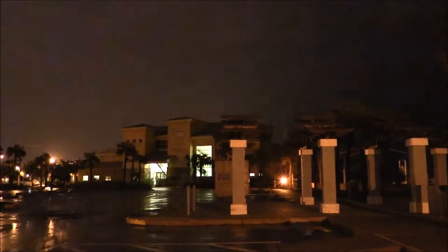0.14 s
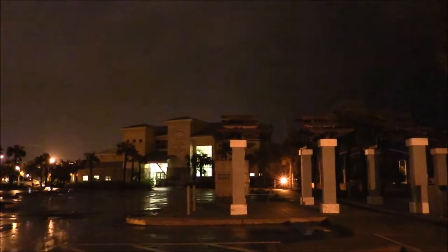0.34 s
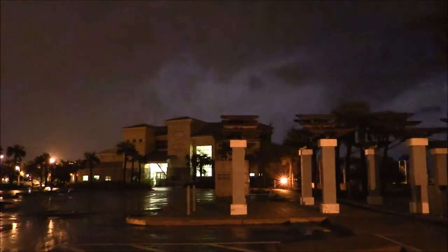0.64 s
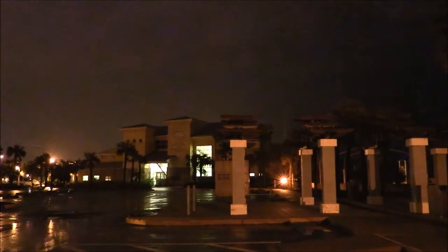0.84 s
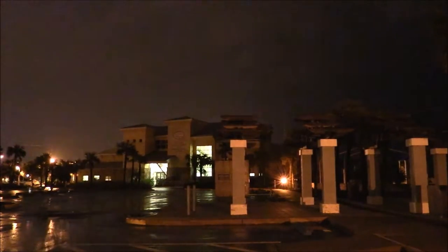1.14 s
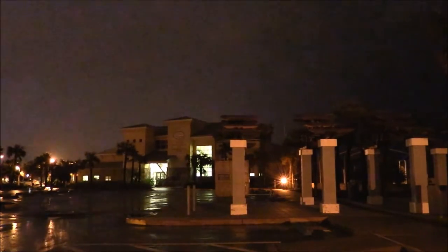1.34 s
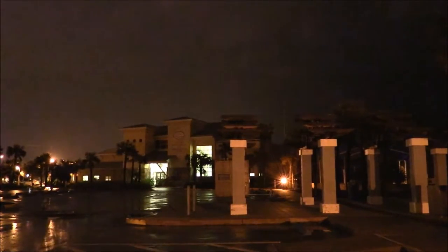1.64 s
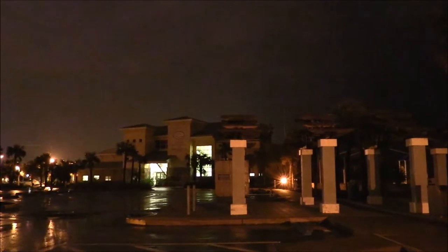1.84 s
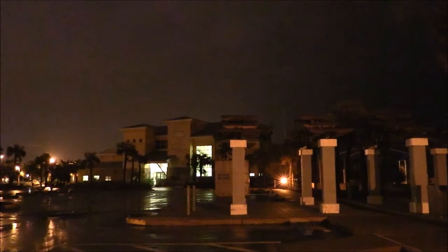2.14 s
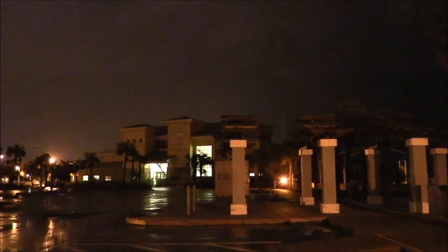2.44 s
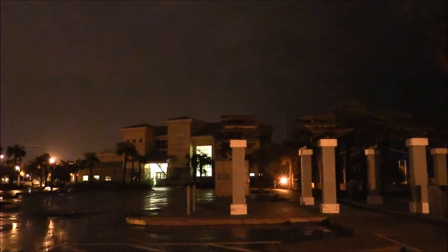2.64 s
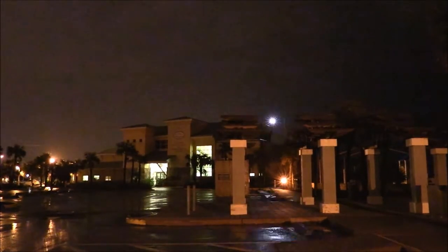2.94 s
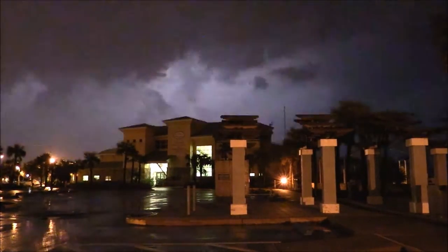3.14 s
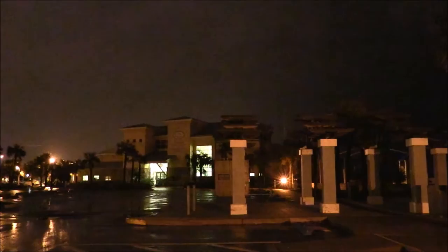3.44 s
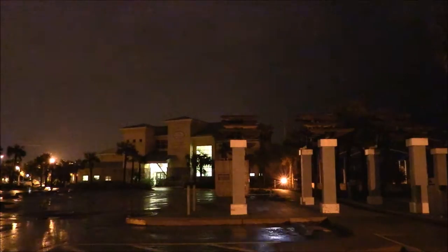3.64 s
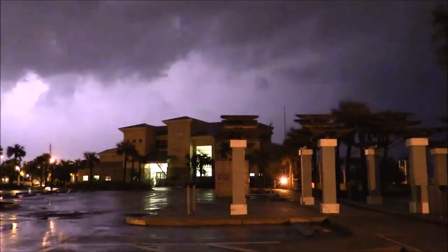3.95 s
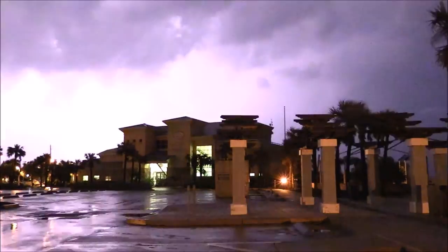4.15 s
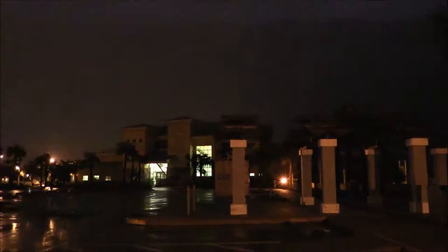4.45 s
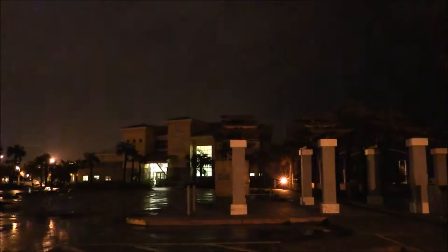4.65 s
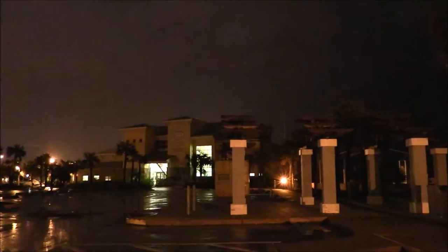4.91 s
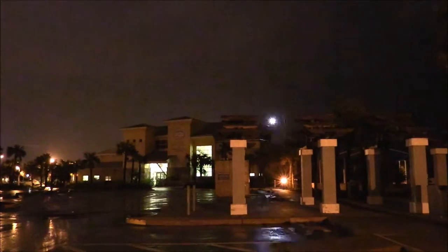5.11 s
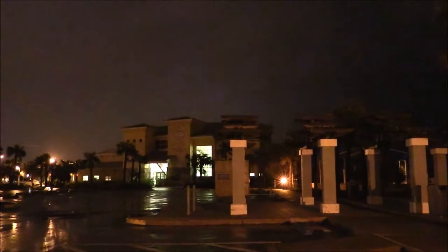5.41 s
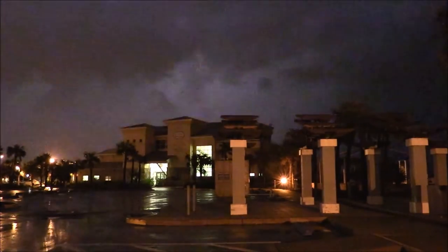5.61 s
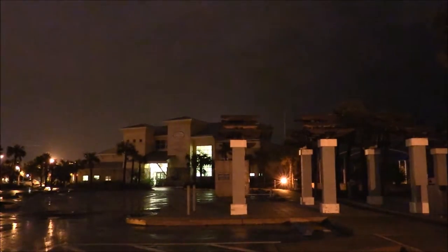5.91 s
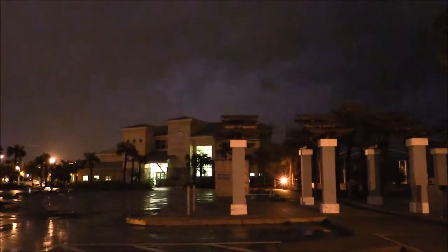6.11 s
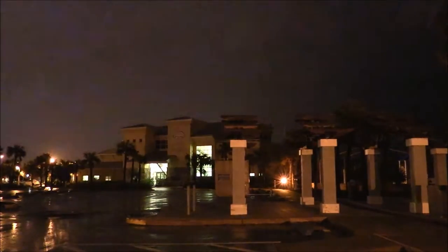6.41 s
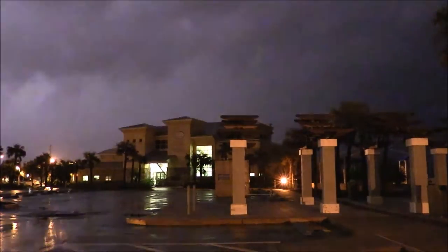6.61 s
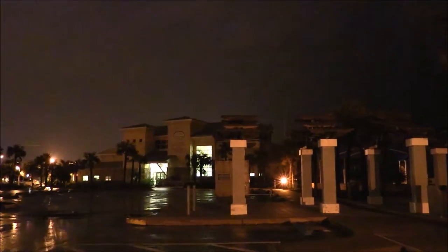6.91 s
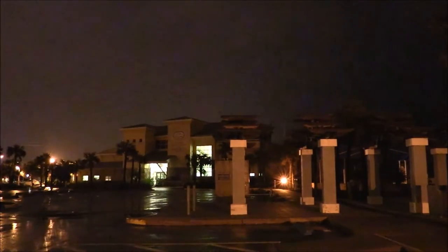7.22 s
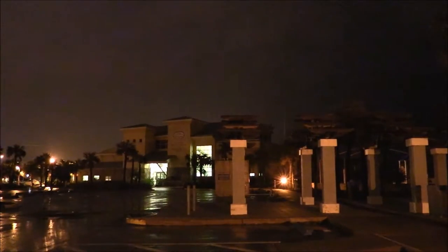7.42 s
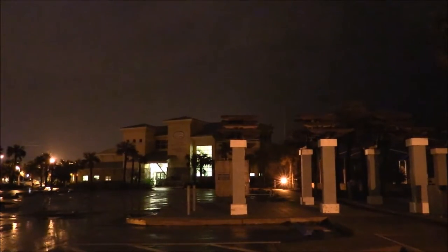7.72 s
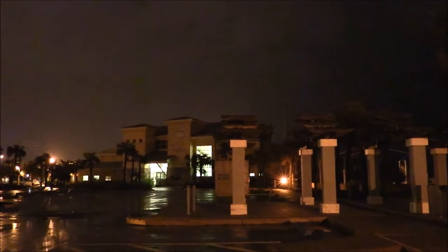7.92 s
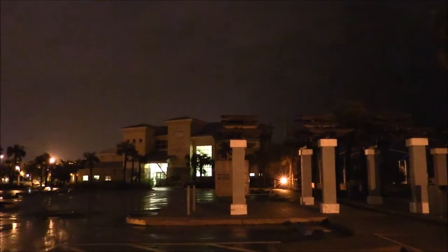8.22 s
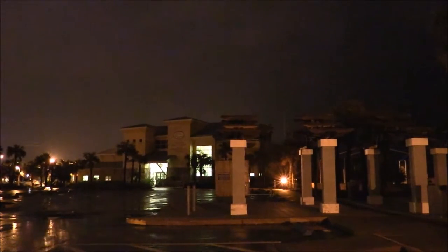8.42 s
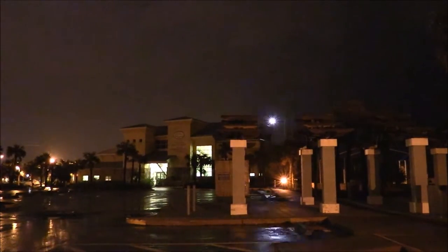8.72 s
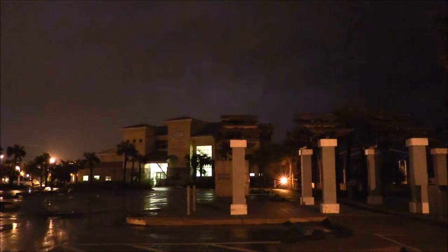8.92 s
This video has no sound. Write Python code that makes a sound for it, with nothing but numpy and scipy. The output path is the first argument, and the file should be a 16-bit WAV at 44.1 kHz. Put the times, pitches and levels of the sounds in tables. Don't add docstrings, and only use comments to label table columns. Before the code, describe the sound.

Deep thunder cracks and rolls over dull rain while an idling engine clatters close by and gusts of wind buffet the microphone.

```python
import sys
import numpy as np
from scipy import signal
from scipy.fft import rfft, irfft, next_fast_len
from scipy.io import wavfile
from scipy.ndimage import uniform_filter1d

SR = 44100
rng = np.random.default_rng(int(sys.argv[2]) if len(sys.argv) > 2 else 0)


def boost_factor(decibels):
    exponent = np.asarray(decibels, float) / 20
    return 10 ** exponent


def bounce(signal):
    frames = np.transpose(np.atleast_2d(signal))
    limited = np.clip(frames, -1, 1)
    pcm = np.round(limited * 32767).astype(np.int16)
    wavfile.write(sys.argv[1], SR, pcm)


N = 399546


def evened(x):
    return x / np.sqrt(np.mean(x ** 2) + 1e-20)


def curve(rows, column):
    rows = np.asarray(rows)
    return np.interp(np.arange(N) / SR, rows[:, 0], rows[:, column])


def swells(times, rise_db, seconds):
    t = np.arange(0, N + 64, 64) / SR
    distance = (t[:, None] - np.asarray(times)) / np.asarray(seconds)
    bells = np.asarray(rise_db) * np.exp(-distance ** 2)
    return np.interp(np.arange(N) / SR, t, bells.sum(axis=1))


def coloured(x, points):
    size = next_fast_len(len(x))
    f, db = np.transpose(points)
    octave = np.log2(np.fft.rfftfreq(size, 1 / SR) + 1)
    below = np.maximum(np.log2(f[0]) - octave, 0) * 20.0
    above = np.maximum(octave - np.log2(f[-1]), 0) * 79.0
    shape_db = np.interp(octave, np.log2(f), db) - (below + above)
    return evened(irfft(rfft(x, size) * boost_factor(shape_db), size)[:len(x)])


def grains(per_s, spread_db):
    chance, size = rng.random(N), rng.exponential(1, N)
    sign = rng.choice([-1., 1.], N)
    return (chance < per_s / SR) * sign * boost_factor(spread_db * np.minimum(size, 4))


def resonate(x, hz, width):
    turn = np.exp(2j * np.pi * np.cumsum(hz * np.ones(len(x))) / SR)
    r = np.exp(-np.pi * width / SR)
    return 2 * (turn * signal.lfilter([1 - r], [1, -r], x / turn)).real


def wander(seconds):
    size = int(seconds * SR)
    once = uniform_filter1d(rng.standard_normal(N), size)
    return evened(uniform_filter1d(once, size))


# (f/Hz, level/dB per Hz)
RAIN_TONE = [(250, -73), (400, -72.5), (650, -79), (1100, -80.5), (1600, -81.5), (1900, -88.5),
             (2700, -88.5), (3000, -91.5), (3800, -89), (5500, -99.0), (7000, -102.3), (10000, -110.7),
             (12000, -111.8), (15600, -118.2)]


def rain(gain_db):
    drops = rng.standard_normal(N) + 0.3 * evened(grains(per_s=2500, spread_db=5.0))
    level_db = -48.5 + gain_db + .6 * wander(0.038)
    return boost_factor(level_db) * coloured(drops, RAIN_TONE)


# (t/s, level/dB, f/Hz, width/Hz, length/ms)
SPLASHES = [
    (3.236, -56, 9000, 5950, 25),
    (3.69, -54, 6500, 3000, 10),
    (3.964, -45, 10000, 2400, 14),
    (3.964, -51, 5600, 800, 13),
    (3.999, -56, 8000, 5000, 120),
    (5.72, -56, 9500, 6000, 20),
]


def splashes():
    t, out = np.arange(-4096, 4096) / SR, np.zeros(N)
    for s, db, hz, width, ms in SPLASHES:
        tone = [(hz - width / 2, -3), (hz, 0), (hz + width / 2, -3)]
        hiss = coloured(rng.standard_normal(len(t)), tone)
        at = round(s * SR) - 4096
        out[at:at + len(t)] += boost_factor(db) * hiss * np.exp(-(2 * t / (ms / 1000)) ** 4)
    return out


# (t/s, level/dB)
WIND = [(0, -66), (.3, -61), (.38, -52), (.5, -63), (1.26, -64), (1.9, -55), (2.39, -52), (2.6, -48.5),
        (3.5, -45), (4.3, -49.5), (5.03, -47), (5.7, -46.5), (6.1, -44.5), (6.8, -44.5), (7.1, -49),
        (7.45, -47), (8.68, -41.5), (9.06, -49)]
# (t/s, rise/dB, length/s)
GUSTS = [(.39, 9.5, 0.098), (1.05, 6, .08), (1.73, 8, .06), (2.55, 8, .1), (2.783, 10, 0.18),
         (3.33, 12.5, .09), (3.76, 9, 0.086), (4.298, 6, 0.2), (6.1, 3, .12), (6.53, 11, 0.12),
         (6.8, 5, 0.091), (7.6, 4, 0.19), (8.556, 9, .12)]
# (f/Hz, level/dB per Hz)
BUFFET_TONE = [(20, -22), (50, -14), (80, -4), (120, 0), (170, -1), (250, -5), (400, -14), (700, -30)]
# (f/Hz, level/dB per Hz)
ROAR_TONE = [(150, -19), (280, 2.5), (400, -3.5), (550, -4), (800, -8), (1200, -8), (2000, -20)]


def wind():
    wind_db = curve(WIND, 1)
    shake_db = -46.5 + 0.49 * (wind_db + 44.5) + swells(*np.transpose(GUSTS))
    thumps = coloured(grains(per_s=1500, spread_db=1.5), BUFFET_TONE)
    buffet = thumps * boost_factor(shake_db + 1.1 * wander(.02))
    roar = coloured(rng.standard_normal(N), ROAR_TONE) * boost_factor(wind_db + 2.0 + 0.56 * wander(0.054))
    return buffet + roar


# (f/Hz, level/dB per Hz)
CLATTER_TONE = [(600, -86.5), (800, -79.5), (1100, -75), (1600, -68.5), (2000, -67), (2700, -68),
                (3200, -78), (3900, -85.5), (5500, -85), (8500, -90), (9500, -90.5), (10500, -99),
                (12000, -99.3), (14300, -103.4)]
# (t/s, level/dB)
IDLE = [
    (0, -37.5),
    (.35, -38),
    (.55, -40.5),
    (.8, -37.5),
    (2.5, -37.5),
    (3.5, -38),
    (5, -38),
    (7, -38.5),
    (9.06, -38),
]
# (f/Hz, width/Hz, level/dB)
RINGS = [(964, 50, -61), (1193, 36, -57.5), (1436, 7.7, -53.5), (1825, 17, -58.5), (1900, 53, -52.5),
         (1988, 17, -57), (2066, 29, -48.5), (2335, 44, -52), (2772, 90, -56.5), (4150, 80, -66),
         (11500, 2000, -67.5), (14000, 1400, -73), (1164, 56, -63.5), (3004, 280, -54)]
# (t/s, level/dB, f/Hz)
SQUEAK = [
    (5.11, -70, 2160),
    (5.135, -41, 2160),
    (5.25, -43, 2160),
    (5.33, -49, 2180),
    (5.42, -50, 2230),
    (5.47, -70, 2250),
]
# (t/s, level/dB, f/Hz)
WHINE = [
    (0, -62, 2004),
    (2, -56, 1973),
    (2.6, -48, 2006),
    (4.9, -49, 2050),
    (5.3, -51, 2030),
    (9.06, -57, 2020),
]


def engine():
    crank_hz = 13.309
    turns = crank_hz * np.arange(N) / SR - .06
    throb_db = 0.65 * np.cos(4 * np.pi * turns) + 0.17 * np.cos(2 * np.pi * turns)
    throb_db = throb_db + 0.074 * np.cos(6 * np.pi * turns)

    ticks = rng.standard_normal(N) + 0.36 * evened(grains(per_s=900, spread_db=5.0))
    uneven_db = throb_db + .5 * wander(0.015) + 0.33 * wander(0.074)
    clatter = coloured(ticks * boost_factor(uneven_db), CLATTER_TONE) * boost_factor(curve(IDLE, 1))

    drive = rfft(rng.standard_normal(N) * boost_factor(0.23 * throb_db))
    f = np.fft.rfftfreq(N, 1 / SR)
    rings = np.zeros(N)
    for hz, width, db in RINGS:
        ring = evened(irfft(drive / (1 + (2 * (f - hz) / width) ** 2), N))
        rings += boost_factor(db + .6 * wander(.2)) * ring

    squeak_hz, whine_hz = curve(SQUEAK, 2), curve(WHINE, 2)
    chirps = resonate(resonate(rng.standard_normal(N), squeak_hz, 140), squeak_hz, 140)
    squeak_db = curve(SQUEAK, 1) + 3.0 * np.cos(4 * np.pi * (turns + 0.17))
    squeak = boost_factor(squeak_db) * evened(chirps)
    hum = resonate(resonate(rng.standard_normal(N), whine_hz, 25), whine_hz, 25)
    whine = boost_factor(curve(WHINE, 1)) * evened(hum)
    return clatter + rings + squeak + whine


# (t/s, peak level/dB, f/Hz, length/ms)
CLAPS = [(0.05, -13.5, 62, 14), (0.157, -12.5, 52.4, 27), (0.274, -13, 42.6, 24), (0.324, -14, 55.5, 11),
         (0.39, -10.5, 64.4, 13), (0.487, -5, 67.0, 3.8), (1.078, -13, 37.6, 44), (1.415, -15, 120.0, 5.5),
         (1.744, -16.5, 55, 25), (2.338, -16.5, 38.6, 35), (2.492, -10, 65.5, 25), (2.65, -7, 49.6, 18),
         (2.705, -2, 60.4, 15.5), (2.806, -5, 47.6, 35), (2.917, -12.5, 37.0, 38), (3.138, -13.5, 37.6, 44),
         (3.313, -8.5, 61, 44), (3.382, -8.5, 58.3, 17), (3.433, -5.5, 44.3, 14), (3.516, -11, 56.5, 33),
         (3.593, -9, 49.8, 42), (3.717, -10, 57.4, 29), (3.76, -12, 50, 20), (3.828, -15, 41.3, 23),
         (3.917, -18, 47.3, 42), (4.176, -18, 64, 25), (4.329, -15, 47.7, 43), (4.402, -13.5, 49.0, 20.0),
         (6.496, -14.5, 50.7, 21), (8.55, -18, 38.8, 23)]
# (t/s, peak level/dB, f/Hz)
THUDS = [(0.687, -18.5, 81.4), (1.044, -14.5, 64), (1.382, -23, 54), (1.59, -13.5, 59.6),
         (1.781, -16.5, 64), (1.908, -17, 53), (1.997, -15.5, 49), (2.072, -15.5, 52), (2.187, -15.6, 50.7),
         (4.27, -17.5, 50.3), (4.714, -22, 86), (5.297, -18.5, 48), (6.282, -18.5, 50), (6.349, -20.5, 65),
         (6.66, -20, 60), (6.807, -21, 66), (6.908, -19.5, 53.6), (7.997, -19.5, 58.6), (8.093, -21, 66),
         (8.593, -21.5, 79)]
# (t/s, peak level/dB)
CROWD = [
    (2.506, -8.5),
    (2.681, -4.5),
    (2.736, -9),
    (2.85, -9.5),
    (3.247, -12.5),
    (3.274, -11.5),
    (3.335, -14),
    (3.552, -11),
    (3.572, -12),
    (3.662, -14),
]
# (t/s, peak level/dB, width/ms)
KNOCKS = [
    (.489, -19, 2.4),
    (1.0575, -14, 2.2),
    (1.4235, -11.5, 1.7),
    (3.455, -24, 1.5),
]


def thunderclaps():
    margin = 4000
    claps, hush = np.zeros(N + 2 * margin), np.zeros(N + 2 * margin)
    t = np.arange(-margin, margin) / SR
    thuds = [(s, db, hz, 1000 * 0.61 / hz) for s, db, hz in THUDS]
    crowd = [(s, db, 55, 10.7) for s, db in CROWD]
    rows = CLAPS + thuds + crowd
    for (s, db, hz, ms), (lean, bend) in zip(rows, rng.random((len(rows), 2))):
        length = ms * np.where(t < 0, .0011, .0015)
        bell = np.exp(-4 * np.log(2) * (t / length) ** 2)
        sagging = hz * t * (1 - (7.0 + 14.9 * bend) * t)
        angle = 2 * np.pi * (sagging + 0.39 * (lean - .3))
        wave = np.cos(angle) + 0.16 * np.cos(2 * angle) + 0.18 * np.sin(angle / 2)
        at = round(s * SR)
        claps[at:at + 2 * margin] += boost_factor(db - 2.5) * bell * wave
        hush[at:at + 2 * margin] += bell
    for s, db, ms in KNOCKS:
        span = slice(round(s * SR), round(s * SR) + 2 * margin)
        u = t / (ms / 1000)
        cover = np.exp(-(u / 4) ** 2)
        claps[span] *= 1 - cover
        hush[span] += cover
        drop = np.exp(-u ** 2 / .3) - .4 * np.exp(-(u + 2) ** 2)
        claps[span] -= boost_factor(db) * np.cos(1.1 * u) * np.where(u < 0, drop, np.exp(-u / 3))
    return claps[margin:N + margin], np.minimum(hush[margin:N + margin], 1)


# (t/s, level/dB)
ROLL = [(0.0, -30), (0.11, -21.5), (0.45, -23.5), (0.67, -26), (0.8, -26), (1.1, -27), (1.6, -24),
        (2.1, -23), (2.6, -26), (2.8, -23), (3.1, -23), (3.5, -17), (3.95, -34), (4.4, -24.5), (5.1, -35.5),
        (6.5, -30.5), (7.7, -33.5), (9.06, -34.5)]
# (t/s, rise/dB)
RETURNS = [
    (4.75, -1),
    (5.03, 4),
    (5.3, 9),
    (5.93, 2),
    (7.16, 3),
    (7.49, 4.5),
    (7.9, 1.5),
    (8.05, 6.5),
    (8.5, 4),
]
# (t/s, rise/dB)
BRANCHES = [(.11, 4), (.34, 3), (.6, 3.5), (1.06, 2), (1.34, 3), (2.35, 3.5), (2.57, 22.5), (2.68, 5),
            (2.8, 7), (3.36, 4), (3.58, 3), (3.8, 6.5), (4.03, 5), (4.25, 4.5), (4.6, -1), (4.92, 2.5),
            (5.4, 2), (6.04, 2), (6.5, 1), (6.82, 0), (7.61, 2.5), (8.61, 6)]
# (f/Hz, level/dB per Hz)
DEEP_TONE = [(12, -50), (20, -25.5), (35, -26), (55, -29), (80, -32.5), (120, -36.5), (180, -49.5),
             (260, -61), (400, -81)]
# (f/Hz, level/dB per Hz)
UPPER_TONE = [(60, -47), (110, 1), (160, 1), (250, -5.5), (400, -16), (600, -19.5), (900, -87)]


def thunder(gain_db):
    roll_db = curve(ROLL, 1)
    deep_db = roll_db + swells(*np.transpose(RETURNS), 0.069) - 2.5
    deep = boost_factor(deep_db) * coloured(grains(per_s=300, spread_db=0.25), DEEP_TONE)
    upper_db = -41.5 + .4 * (roll_db + 31.5) + swells(*np.transpose(BRANCHES), 0.055)
    upper = boost_factor(upper_db + gain_db) * coloured(grains(per_s=1000, spread_db=1.5), UPPER_TONE)
    claps, hush = thunderclaps()
    return deep * (1 - 0.74 * hush) + upper + claps


# (t/s, depth/dB, hold/s)
DUCKS = [
    (0, -1.5, 0.52),
    (2.74, -2.5, 1.05),
]


def left_gain_db():
    t, db = np.arange(N) / SR, np.zeros(N)
    for start, depth_db, hold in DUCKS:
        since = t - start
        held = depth_db * np.exp(-np.maximum(since - hold, 0) / 0.067)
        snap = -8 * np.exp(-np.maximum(since, 0) / .12) * (start > .1)
        db = db + np.clip(since / 0.052, 0, 1) * (held + snap)
    off = t - 2.59
    away = np.where(off < 0, -off / 0.079, off / 0.048)
    return db - 41 * np.maximum(1 - away, 0)


def scene():
    gain_db = left_gain_db()
    wash, air, motor = rain(gain_db), wind(), engine()
    motor_spill = boost_factor(-25) * np.roll(resonate(motor, 1300, 700), -3)
    air_spill = boost_factor(-14) * resonate(air, 300, 350)
    left = thunder(gain_db) + wash - (motor_spill + air_spill) * boost_factor(gain_db - 1.5)
    rain_spill = boost_factor(-10.5) * resonate(resonate(wash, 390, 450), 390, 450)
    right = air + motor + splashes() - rain_spill
    return np.array([left, right])


def roll_off(x):
    return signal.sosfilt(signal.butter(12, 15720, fs=SR, output="sos"), x)


def record(dry):
    ceiling = .64
    left = np.clip(dry[0], -ceiling, ceiling)
    bass_cut = signal.butter(2, 85, "highpass", fs=SR, output="sos")
    right = signal.sosfilt(bass_cut, dry[1])
    return roll_off(np.array([left, right]))


dry = scene()
out = record(dry)
bounce(out)
```